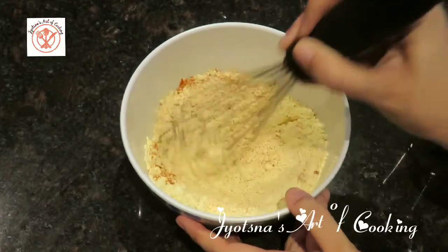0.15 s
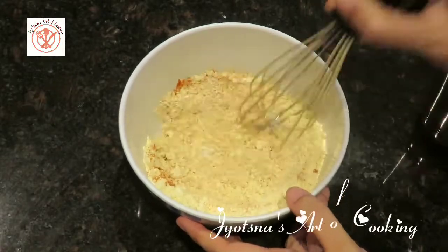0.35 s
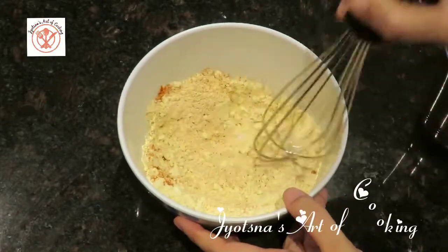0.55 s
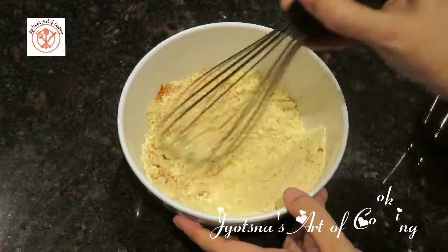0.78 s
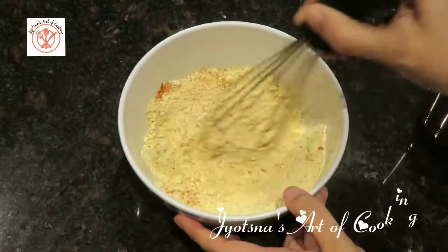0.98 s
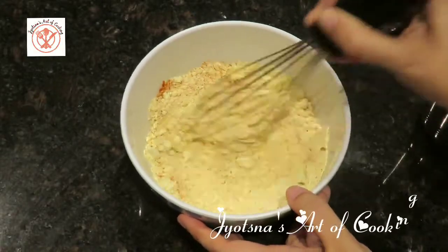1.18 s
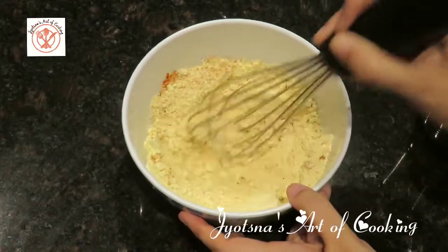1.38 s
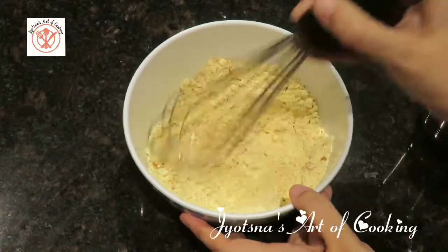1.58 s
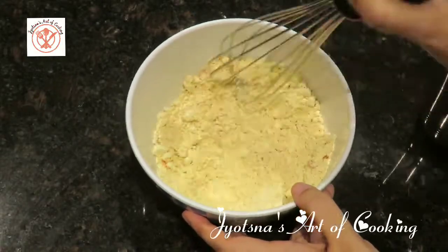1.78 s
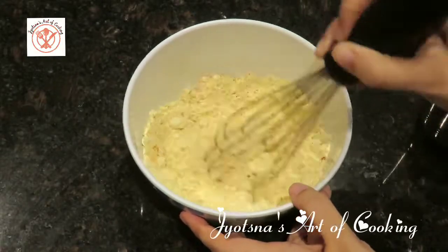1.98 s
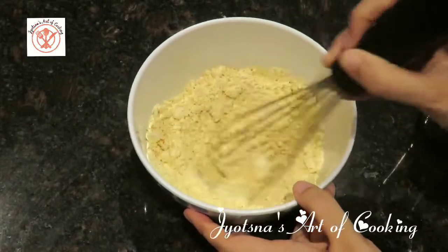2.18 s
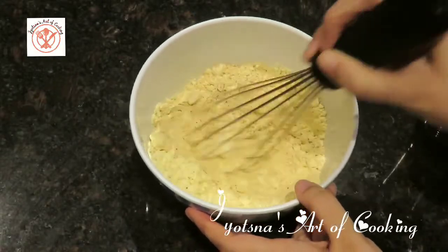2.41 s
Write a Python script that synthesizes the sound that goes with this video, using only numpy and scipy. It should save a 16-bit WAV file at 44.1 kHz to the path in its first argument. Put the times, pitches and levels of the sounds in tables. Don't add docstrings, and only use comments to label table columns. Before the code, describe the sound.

A wire whisk works dry flour in a ceramic bowl, heard close in a small kitchen. Audible room hiss opens; at 0.2 s a loud hollow clatter of knocks, then gritty scraping until 0.35 s. Near 0.43 s the level suddenly falls to near silence. Faint taps at 0.55 and 0.65 s, soft powdery scrapes from 1.05 s, a dull knock at 1.45 s, and bright wire clicks at 1.62, 1.97 and 2.11 s.

```python
import sys
import numpy as np
from scipy import signal
from scipy.fft import rfft, irfft, next_fast_len
from scipy.io import wavfile
from scipy.ndimage import uniform_filter1d, map_coordinates

SR = 44100
rng = np.random.default_rng(int(sys.argv[2]) if len(sys.argv) > 2 else 0)


def materialize(psi):
    bounded = np.clip(np.atleast_2d(psi).T, -1, 1)
    quanta = np.round(bounded * 32767).astype(np.int16)
    wavfile.write(sys.argv[1], SR, quanta)


def magnitude_from_level(level_db):
    exponent = np.asarray(level_db, float) / 20
    return 10 ** exponent


N = 108045
BLOW_N = SR // 8

# (frequency [Hz], level [dB], t60 [s])
WALL_MODES = [(1440, 4, .07), (1600, -2, .03), (1839, 1.5, 0.058), (2030, 5, 0.033), (2147, 3, 0.021),
              (2483, 2.5, 0.047), (2653, -0.5, .028), (3200, -6.5, 0.097), (3990, -6, 0.015)]
# (frequency [Hz], level [dB], t60 [s])
WIRE_MODES = [(3295, -13, 0.01), (4484, -7, 0.059), (4820, -12, .025), (5716, -0.5, 0.015),
              (6340, -5, 0.026), (6807, -4.5, 0.033), (7580, -4.5, 0.019), (8477, -1.5, .03),
              (9170, -4.5, 0.0063), (10880, -4, 0.011), (11490, 0.5, .03), (13000, 4, 0.0086),
              (12700, -9.5, 0.045), (13500, -3.5, .02)]

WIRE_WIDEN = 2.8
ATTACK_S = 0.00081
FADER_S, FADER_DB, FADER_MOVE_S = 0.4311, 25, 0.00304


def unit(x):
    return x / np.sqrt(np.mean(x ** 2) + 1e-20)


def along(points, hz):
    f, v = np.transpose(points)
    return np.interp(np.log(hz + 1), np.log(f + 1), v)


def wobble(rate_hz):
    knots = rng.standard_normal(int(N * rate_hz / SR) + 4)
    return map_coordinates(knots, [np.arange(N) * rate_hz / SR])


def filtered(x, response, size=N):
    m = next_fast_len(size + SR // 8)
    spectrum = rfft(x, m) * response(np.fft.rfftfreq(m, 1 / SR))
    return irfft(spectrum, m)[..., :size]


def patchy(x, depth_db, size):
    z = signal.stft(x, nperseg=256)[2]
    field = uniform_filter1d(rng.standard_normal(z.shape), size[0], 0)
    field = uniform_filter1d(field, size[1], 1)
    return signal.istft(z * magnitude_from_level(depth_db * unit(field)), nperseg=256)[1][:N]


def fader_db(s):
    return FADER_DB * np.clip((FADER_S - s) / FADER_MOVE_S + .5, 0, 1)


def ring(modes, shade_db, life, scatter_db, attack_s=ATTACK_S):
    press_s, detune = 0.0058, .008
    hz, db, t60 = np.transpose(modes)[..., None]
    t = np.arange(BLOW_N) / SR
    chance = rng.standard_normal((2, len(modes), 1))
    level_db = db + shade_db(hz) + scatter_db * chance[0]
    decay_db = -60 * np.maximum(t - press_s * life, 0) / (t60 * life)
    tones = np.sin(2 * np.pi * hz * (1 + detune * chance[1]) * t)
    waves = magnitude_from_level(level_db + decay_db) * tones
    return waves.sum(0) / np.linalg.norm(magnitude_from_level(level_db)) * (1 - np.exp(-t / attack_s))


def burst(t60_s, hold_s=0):
    t = np.arange(BLOW_N) / SR
    decay = magnitude_from_level(-60 * np.maximum(t - hold_s, 0) / t60_s)
    return decay * (1 - np.exp(-4 * t / ATTACK_S)) * rng.standard_normal(BLOW_N)


def resonances(modes, widen):
    def response(f):
        total = 0
        for k, (hz, db, t60) in enumerate(modes):
            width_hz = widen * np.log(1000) / (np.pi * t60)
            damping = 1j * f * width_hz
            total = total + (-1) ** k * magnitude_from_level(db) * damping / (hz * hz - f * f + damping)
        return total
    return response


def air():
    # (frequency [Hz], level [dB per Hz])
    air_spectrum = [(25, 1), (60, -9), (130, -6.5), (300, -1.5), (480, -8), (1100, -15), (4500, -24.5),
                    (16000, -43)]
    # (frequency [Hz], level [dB rms])
    hum_tones = [(60, -83), (123, -83)]
    noise = patchy(rng.standard_normal(N), .7, size=(3, 20))
    hiss = unit(filtered(noise, lambda hz: magnitude_from_level(along(air_spectrum, hz))))
    drone = 0
    for hz, db in hum_tones:
        level = magnitude_from_level(db + 2.5 + 2.4 * wobble(15))
        phase = 2 * np.pi * hz * np.arange(N) / SR + 1.2 * wobble(23)
        drone = drone + level * np.sin(phase)
    return magnitude_from_level(-70) * hiss + drone


def room(x):
    # (frequency [Hz], t60 [s])
    room_t60 = [(150, 1), (1000, 0.56), (4000, 0.097), (12000, 0.28)]
    # (frequency [Hz], level [dB])
    room_send = [(120, -23.5), (500, -9), (800, -9.5), (1100, -18.5), (1500, -18.5), (4000, -10),
                 (12000, -27)]
    hz, t, z = signal.stft(rng.standard_normal(SR * 3 // 4), SR, nperseg=256)
    decay = magnitude_from_level(-60 * t / along(room_t60, hz)[:, None])
    tail = signal.istft(z * decay, SR, nperseg=256)[1]
    sent = filtered(x, lambda f: magnitude_from_level(along(room_send, f)))
    delayed = np.pad(sent, (300, 0))
    return signal.fftconvolve(delayed, tail / np.linalg.norm(tail))[:N]


def nudges():
    # (start [s], length [s], centre [Hz], level [dB])
    nudge_events = [(.217, 0.017, 339, -33.5), (0.223, 0.026, 156, -38), (0.242, 0.051, 587, -40),
                    (.282, 0.022, 1140, -37.5), (.32, 0.033, 1040, -37.5), (0.356, 0.044, 1065, -43),
                    (0.402, 0.042, 1080, -45), (0.551, 0.018, 109.2, -61), (.68, .025, 130, -63.5),
                    (0.905, 0.0095, 913, -58.5), (0.916, 0.027, 1124, -59), (0.913, 0.027, 300, -61),
                    (0.938, 0.04, 805, -69.5), (1.045, 0.029, 119, -66.5), (1.155, .014, 2560, -66),
                    (1.212, 0.016, 1487, -66), (1.233, 0.011, 2600, -63.5), (1.665, 0.017, 700, -58),
                    (1.79, 0.016, 800, -67), (1.965, .015, 760, -63), (1.975, 0.018, 260, -63),
                    (2.108, 0.015, 583, -60), (2.264, 0.023, 1600, -68.5)]
    relative_width, rise = .3, .5
    out, size = np.zeros(N + SR), SR // 16
    t = np.arange(size) / SR
    for s, length, hz, db in nudge_events:
        def band(f):
            damping = 1j * f * hz * relative_width
            return (damping / (hz * hz - f * f + damping)) ** 2
        swell = np.sin(np.pi * np.clip(t / length, 0, 1) ** rise)
        rub = filtered(swell * rng.standard_normal(size), band, size)
        rub *= np.linalg.norm(swell) / np.linalg.norm(rub)
        out[round(s * SR):][:size] += magnitude_from_level(db - fader_db(s)) * rub
    return out[:N]


def grit():
    hits = (rng.random(N) < .3) * rng.standard_normal(N)
    uneven_db = 1.7 * rng.exponential(size=N) + 2.2 * wobble(160)
    return patchy(hits * magnitude_from_level(uneven_db), 2.4, size=(5, 5))


def scrapes():
    # (start [s], length [s], wall level [dB], wire hiss level [dB])
    strokes = [(-.12, 0.25, -50.5, -65), (0.109, 0.32, -79, -51), (0.239, 0.098, -44, -55.5),
               (0.281, 0.039, -36.5, -49), (0.305, 0.046, -41.5, -42.5), (1.388, 0.061, -76.5, -81),
               (0.458, 0.029, -98, -74), (0.654, 0.026, -62.5, -58), (0.665, 0.051, -71, -66.5),
               (2.404, 0.037, -69, -77.5), (2.421, 0.038, -67, -69.5), (0.802, .07, -84.5, -87),
               (2.012, 0.04, -90, -75), (0.899, 0.041, -83, -74.5), (0.923, 0.056, -75.5, -72.5),
               (1.05, 0.023, -74.5, -73), (1.08, 0.043, -69, -75.5), (1.104, 0.083, -66, -66.5),
               (1.151, 0.054, -69.5, -87), (1.188, 0.05, -64.5, -66), (1.23, 0.021, -67.5, -66.5),
               (1.241, 0.053, -66, -71.5), (1.27, 0.15, -80.5, -81.5), (1.354, 0.034, -63.5, -76.5),
               (1.466, 0.027, -59, -67), (1.516, 0.041, -66.5, -73.5), (1.607, 0.2, -100, -102),
               (1.774, 0.039, -92, -81.5), (1.862, 0.043, -94, -71), (1.956, 0.073, -80, -73.5),
               (2.112, 0.082, -72.5, -68.5), (2.221, 0.088, -72.5, -66.5), (2.315, 0.037, -65, -68.5),
               (2.348, 0.062, -67, -67.5)]
    # (frequency [Hz], level [dB], t60 [s])
    singing_mode = [(1082, 6, .3)]
    t = np.arange(N) / SR
    wall_level, wire_level = np.zeros((2, N))
    for s, length, wall_db, wire_db in strokes:
        swell = np.sin(np.pi * np.clip((t - s) / length, 0, 1) ** 0.88) ** 2.3
        swell = swell * magnitude_from_level(-fader_db(s))
        wall_level += magnitude_from_level(wall_db) * swell
        wire_level += magnitude_from_level(wire_db) * swell
    wall_response = resonances([*singing_mode, *WALL_MODES], 2.5)
    wire_response = resonances(WIRE_MODES, WIRE_WIDEN)
    out = 0
    for level, response in (wall_level, wall_response), (wire_level, wire_response):
        grains = grit()
        out = out + filtered(level * grains, response) / np.std(filtered(grains, response))
    return out


def clashes():
    # (time [s], peak level [dB], brightness [dB per octave])
    clash_events = [(0.2085, -29, -5), (0.219, -25.5, -23.5), (.548, -39, -15), (.553, -60, -20),
                    (0.558, -39, 3), (0.564, -55.5, 10.5), (.574, -67, 8), (0.649, -44.5, -6),
                    (0.653, -29, -3.5), (0.681, -46.5, -7), (1.039, -57, -4), (1.044, -49.5, -4),
                    (1.153, -58.5, 5), (1.1605, -58, -2), (1.176, -60, -12), (1.218, -54, 3),
                    (1.234, -56, 5), (1.24, -71, -5), (1.348, -48, -14), (1.454, -44, -21.5),
                    (1.501, -52.5, 4), (1.6193, -21.5, 3), (1.628, -36.5, 2), (1.632, -64, 3.5),
                    (1.666, -42, -16), (1.687, -52, 1.5), (1.959, -47.5, -10.5), (1.962, -38.5, 4),
                    (1.965, -31.5, 11), (1.968, -35, -11), (2.105, -28.5, -0.5), (2.111, -20.5, 0),
                    (2.1184, -24, -3), (2.122, -34, -3), (2.126, -39, -8), (2.246, -49, 8),
                    (2.268, -56.5, 2.5), (2.333, -60.5, 9), (2.382, -69, 6), (2.39, -64.5, -3),
                    (2.397, -65.5, 3), (2.41, -62.5, -1)]
    wire_db, chatter_gain = -13, 1.7
    chatter_t60_s, chatter_hold_s = 0.033, 0.00044
    out = np.zeros(N + SR)
    damped_wires = resonances(WIRE_MODES, WIRE_WIDEN)
    for s, db, tilt_db in clash_events:
        def shade(hz):
            return tilt_db * np.log2((hz + 1500) / 9000)
        puff = burst(chatter_t60_s, chatter_hold_s)
        chatter = filtered(puff, lambda f: damped_wires(f) * magnitude_from_level(shade(f)), BLOW_N)
        ringing = ring(WIRE_MODES, shade, life=.5, scatter_db=8)
        level = magnitude_from_level(db + wire_db - fader_db(s))
        out[round(s * SR):][:BLOW_N] += level * (chatter_gain * chatter + ringing)
    return out[:N]


def favour(hz, loss_db):
    return lambda f: -np.minimum(loss_db * abs(np.log2(f / hz)), 21)


def knocks():
    # (time [s], favoured body [Hz], body level [dB], favoured wall [Hz], wall level [dB])
    knock_events = [(0.2098, 1185, -18.5, 2100, -43), (.210, 600, -35, 2500, -60),
                    (.2185, 540, -22, 2375, -34), (0.2212, 1049, -15.5, 1820, -33.5),
                    (.224, 757, -24, 2400, -54), (0.228, 1154, -23.5, 1817, -39.5),
                    (.241, 1072, -24.5, 2450, -49), (0.26, 1100, -31.5, 2450, -61),
                    (0.462, 1158, -61.5, 2015, -89.5), (.5465, 571, -47.5, 2070, -50.5),
                    (.551, 574, -46, 4050, -61), (0.5571, 1127, -58.5, 2026, -48.5),
                    (.564, 290.6, -59.5, 1440, -53), (0.652, 1058, -50, 1814, -65.5),
                    (.6815, 468, -51, 2167, -58.5), (.683, 1146, -54.5, 2170, -74),
                    (.908, 990, -53, 1460, -66.5), (.92, 698, -57, 1510, -69.5),
                    (0.932, 206.6, -56, 1500, -78), (1.039, 1057, -52, 2002, -71),
                    (1.041, 585, -57.5, 1500, -62.5), (1.047, 300, -56, 1930, -66),
                    (1.09, 1080, -64.5, 2047, -61), (1.349, 1107, -51.5, 1960, -54.5),
                    (1.399, 307, -57, 2000, -82), (1.4529, 1026, -42, 1903, -43.5),
                    (1.501, 1060, -72, 1890, -50), (1.619, 993, -56.5, 1870, -55),
                    (1.6663, 1100, -44, 2666, -57), (1.666, 619, -49.5, 3900, -61),
                    (1.793, 1113, -64.5, 2580, -79.5), (1.867, 789, -60.5, 2000, -84.5),
                    (1.964, 1104, -55.5, 1747, -59), (2.104, 1153, -68.5, 1730, -54.5),
                    (2.113, 946, -51.5, 1440, -57.5), (2.119, 880, -60.5, 3340, -61.5),
                    (2.231, 1090, -61, 1993, -70.5), (2.363, 1070, -64.5, 1946, -58),
                    (2.391, 1070, -69, 2000, -57.5), (2.409, 1055, -77, 2000, -61)]
    # (frequency [Hz], level [dB], t60 [s])
    body_modes = [(115, -9, .06), (185, -6, .05), (295, -7, .04), (430, -3, .035), (528, -1, .04),
                  (580, -2, .04), (670, -5, .03), (755, -2, .035), (945, -7, .025), (1025, -5, .025),
                  (1045, -13, .22), (1100, -5, .025), (1095, -16, .19), (1160, -11, .12)]
    body_gain_db, wall_gain_db, scatter_db = -1, 4, 2.5
    spot_db, spot_t60_s = 3, 0.028
    crack_gain, crack_t60_s = 0.85, 0.017
    low_hz = 95
    tone, crack = np.zeros((2, N + SR))
    for s, body_hz, body_db, wall_hz, wall_db in knock_events:
        at = round(s * SR)
        body_level = magnitude_from_level(body_db + body_gain_db - fader_db(s))
        wall_level = magnitude_from_level(wall_db + wall_gain_db - fader_db(s))
        struck_body = [*body_modes, (body_hz, spot_db, spot_t60_s)]
        struck_wall = [*WALL_MODES, (wall_hz, spot_db, spot_t60_s)]
        body = ring(struck_body, favour(body_hz, 60), 0.99, scatter_db, attack_s=0.0026)
        wall = ring(struck_wall, favour(wall_hz, 18), .6, scatter_db)
        tone[at:][:BLOW_N] += body_level * body + wall_level * wall
        crack[at:][:BLOW_N] += wall_level * crack_gain * burst(crack_t60_s)
    radiated = filtered(tone[:N], lambda f: (1j * f / (low_hz + 1j * f)) ** 2)
    return radiated + filtered(crack[:N], resonances(WALL_MODES, WIRE_WIDEN))


def scene():
    whisk = knocks() + clashes() + scrapes()
    return (whisk + room(whisk) + air() + nudges())[None]


def low_pass(x):
    return signal.sosfilt(signal.butter(12, 16430, fs=SR, output="sos"), x)


def record(dry):
    # (frequency [Hz], level [dB])
    mic_response = [(20, -14), (80, 0), (14500, -4), (15800, -7.5), (16300, -29)]
    heard = filtered(dry, lambda hz: magnitude_from_level(along(mic_response, hz)))
    mix = heard * magnitude_from_level(fader_db(np.arange(N) / SR))
    return low_pass(mix)


dry = scene()
out = record(dry)
materialize(out)
```